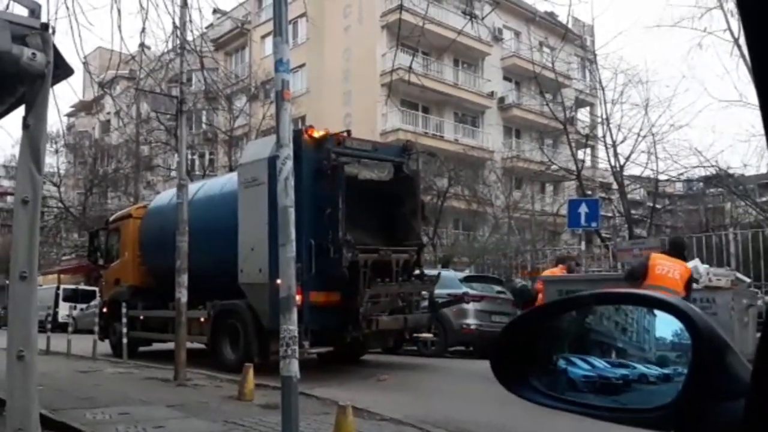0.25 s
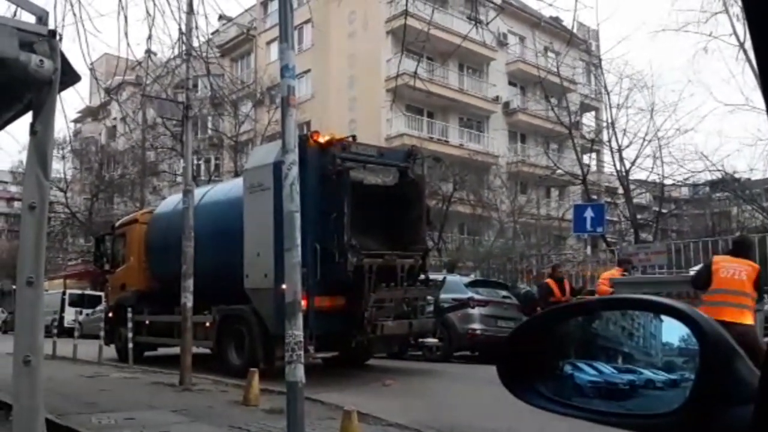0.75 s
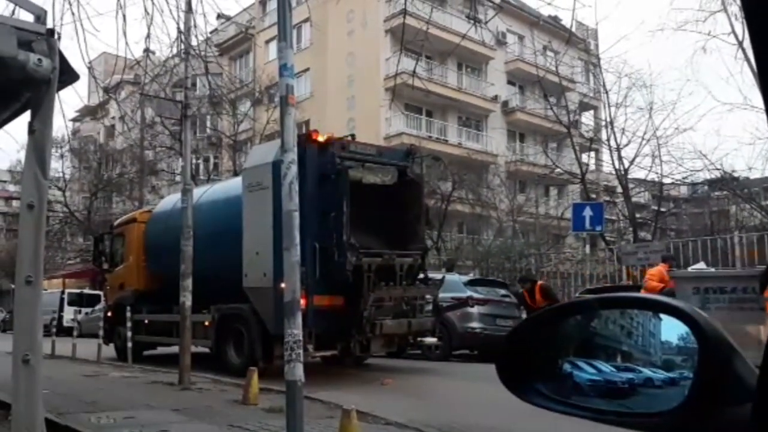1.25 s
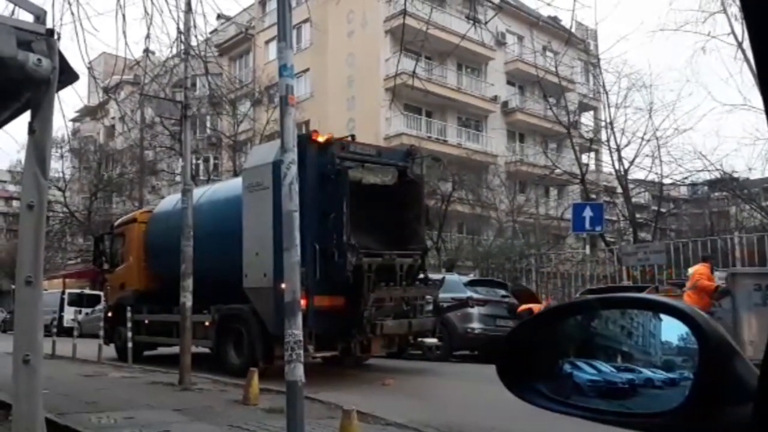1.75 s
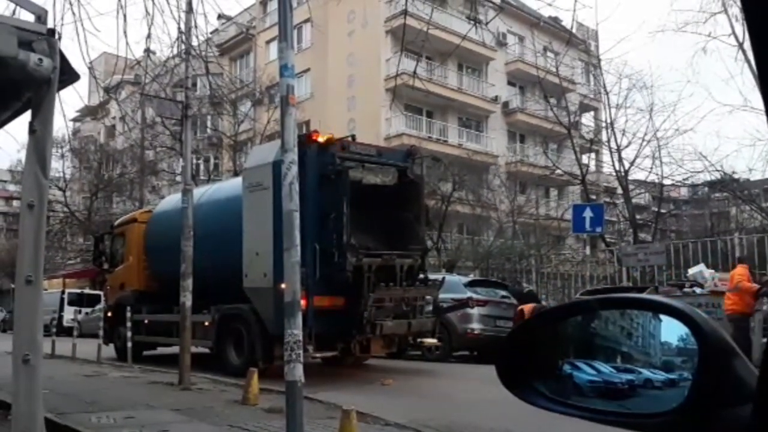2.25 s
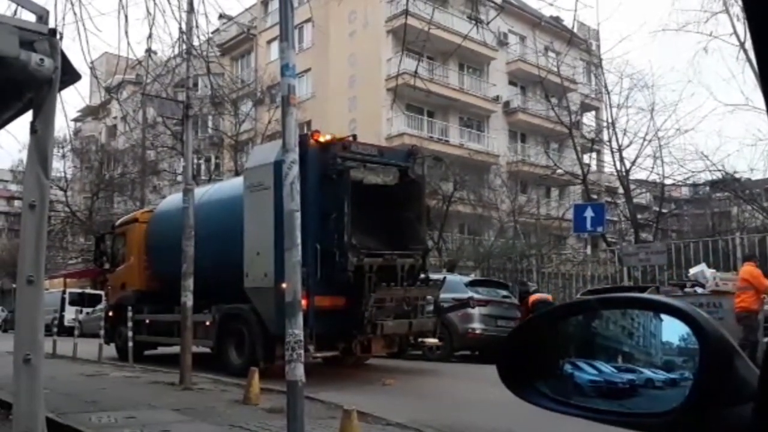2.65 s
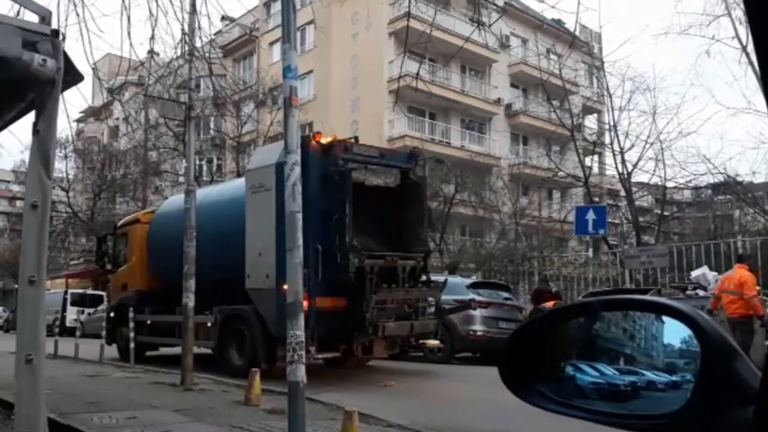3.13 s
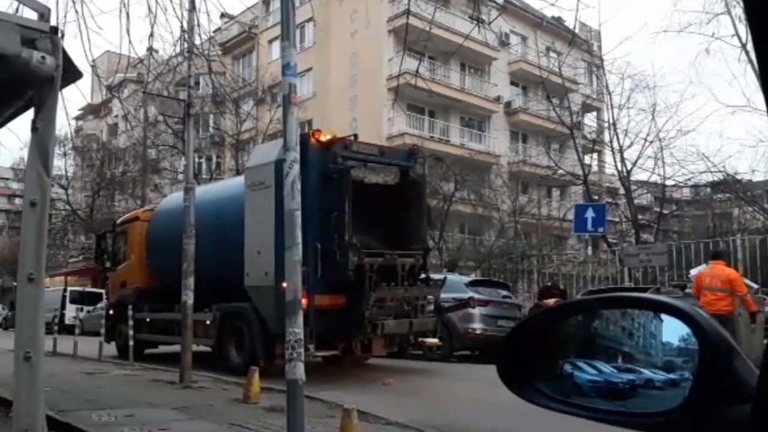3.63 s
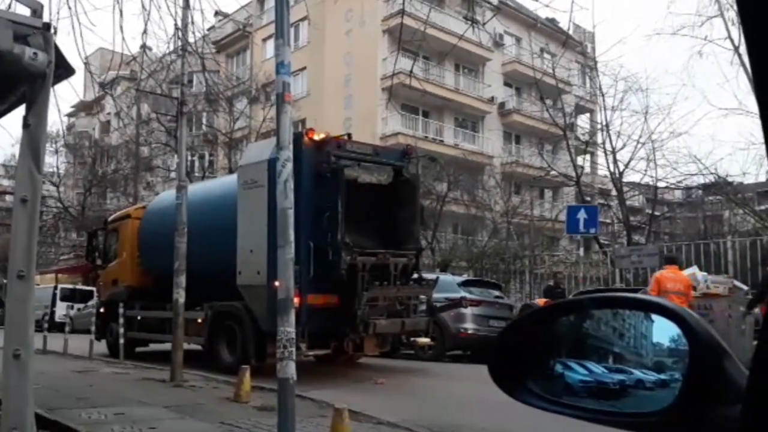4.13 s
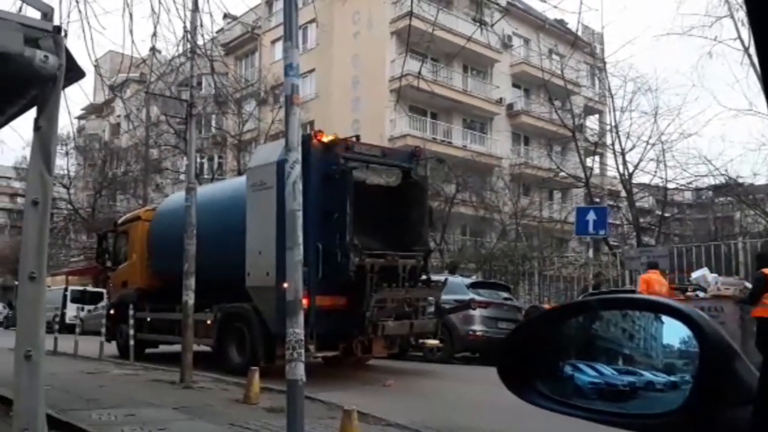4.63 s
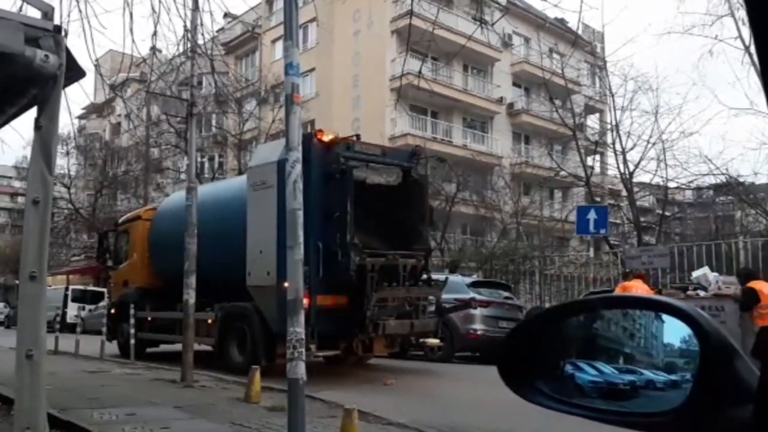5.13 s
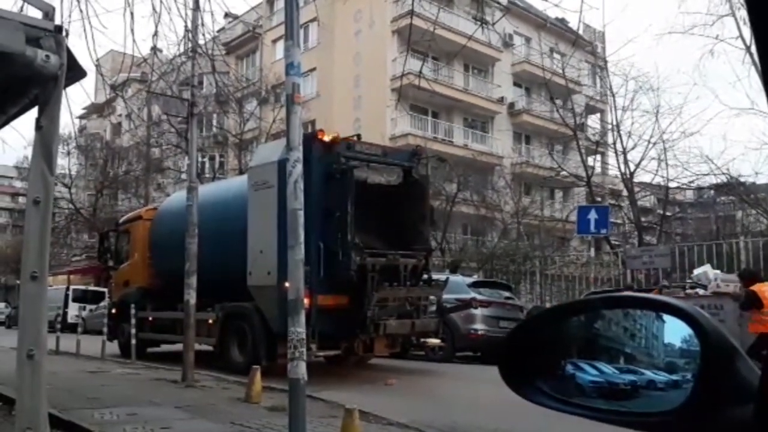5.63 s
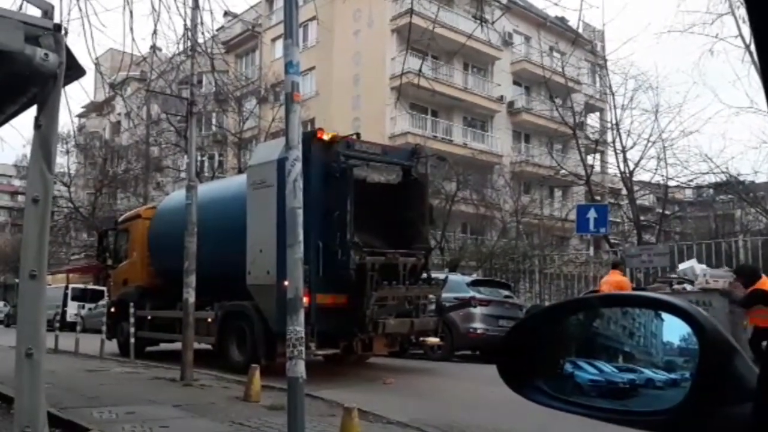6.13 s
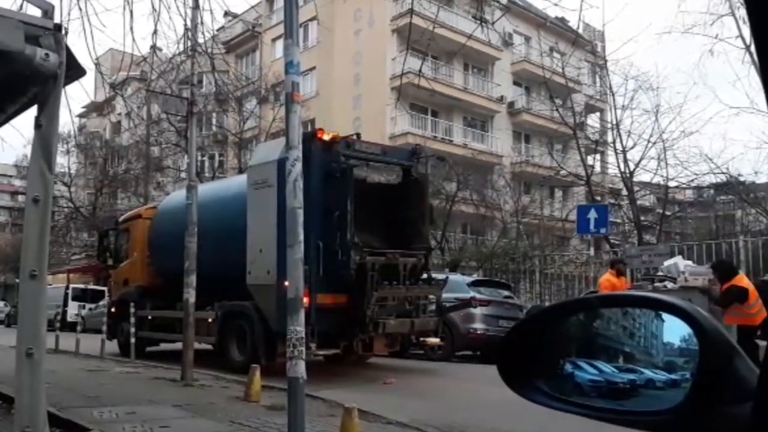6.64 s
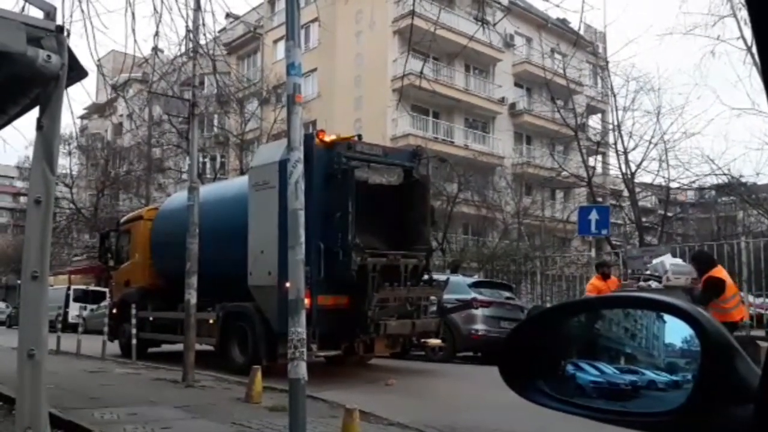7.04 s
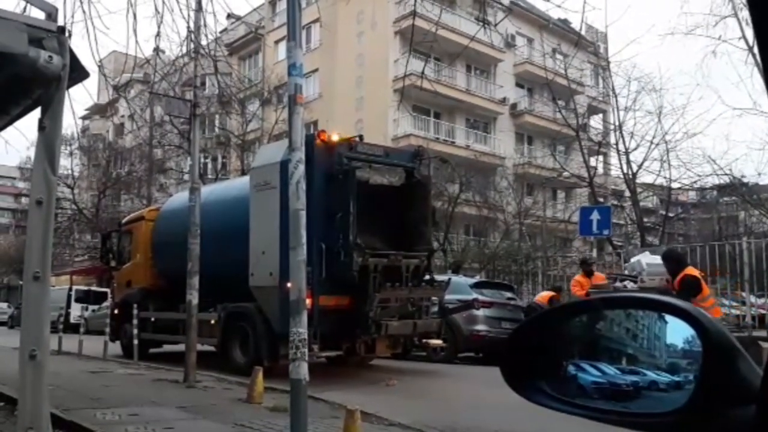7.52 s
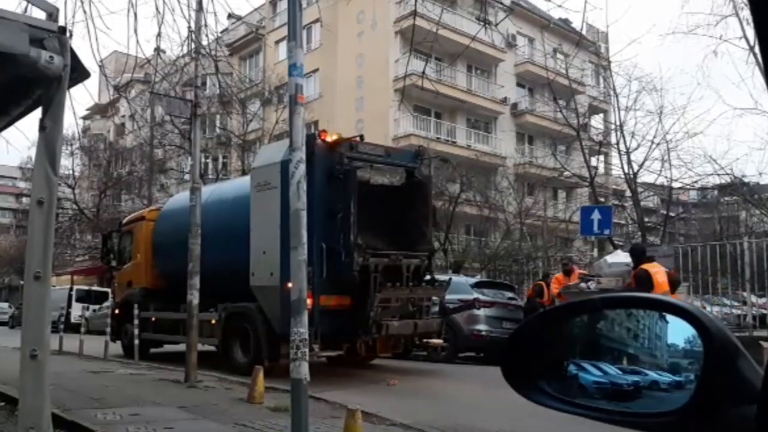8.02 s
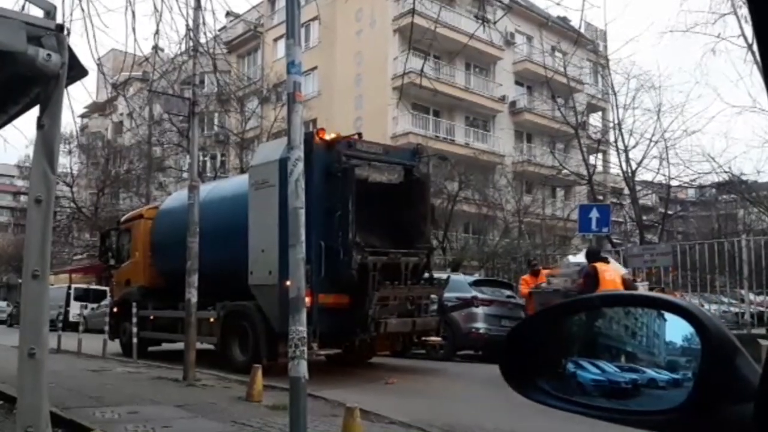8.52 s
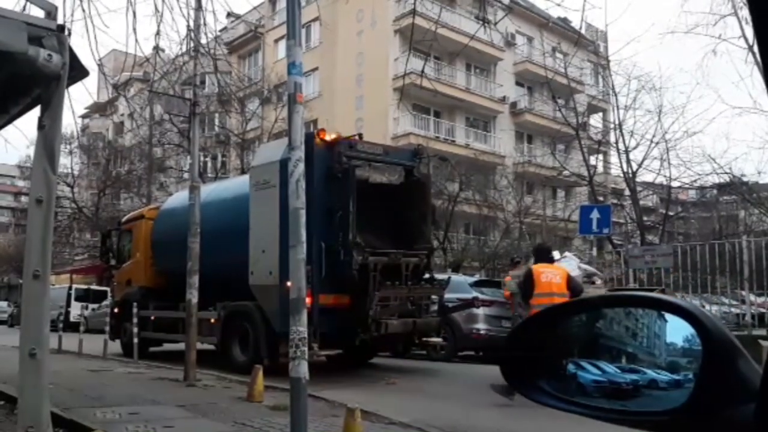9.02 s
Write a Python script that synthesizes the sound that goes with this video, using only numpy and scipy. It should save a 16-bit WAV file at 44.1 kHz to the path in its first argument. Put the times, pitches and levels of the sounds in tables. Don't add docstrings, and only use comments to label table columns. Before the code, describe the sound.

Heard from inside a parked car with its own engine ticking over: a refuse truck across the street idles in a steady, deep, pulsing boom that dominates. Beneath it, muffled by glass, metal bins roll and rattle continuously, with dull knocks, small clinks, sharp ticks and brief high squeaks. Knocks gather around two to four seconds and again after seven. Stereo cabin pickup, soft hiss, slight echo from house fronts.

```python
import sys
import numpy as np
from scipy import signal
from scipy.fft import rfft, irfft, next_fast_len
from scipy.io import wavfile

SR = 44100
rng = np.random.default_rng(int(sys.argv[2]) if len(sys.argv) > 2 else 0)


def dump(signal):
    limited = np.clip(np.atleast_2d(signal).T, -1, 1)
    pcm = np.round(limited * 32767).astype(np.int16)
    wavfile.write(sys.argv[1], SR, pcm)


def gain_from_decibels(decibels):
    exponent = np.asarray(decibels, float) / 20
    return 10 ** exponent


N = 408807
LEAD = SR // 2
SIZE = next_fast_len(N + 2 * LEAD)
HZ = np.fft.rfftfreq(SIZE, 1 / SR)
TIME = (np.arange(SIZE) - LEAD) / SR

# (strength [ratio], lateness [ms])
CYLINDERS = [(1.934, -.153), (1.439, -.61), (1.885, -.844), (1.993, -.944), (2.218, -.571), (1.659, -.484)]
# (frequency [Hz], width [Hz], signed height [ratio])
BOOM_MODES = [(27.4, 35.41, -.037), (66.01, 3, .05), (93.97, 3.01, -.071), (105.06, 6.51, -.202),
              (112.14, 13.14, 1.066), (114.63, 10.21, -1.756), (124.03, 3, 1.678), (142.48, 4.99, -.143),
              (160.46, 3, .547), (178.25, 3, 1.629), (178.81, 4.51, -1.132), (208.54, 3.47, .875),
              (208.64, 3.12, -.903), (266.44, 3, .019)]
PANEL_ORDERS = [9, 11, 13, 14, 15, 16, 26, 33, 38, 39, 40, 42, 43, 44, 45, 46, 49, 50, 54, 55, 56, 57, 58,
                60]
PANEL_DB = [-69, -68, -73, -74, -63, -69, -64, -60, -64, -59, -66, -63, -64, -70, -61, -67, -75, -70, -74,
            -71, -68, -76, -76, -78]
IDLE_ORDERS = [3, 4, 5, 6, 8, 9, 10, 12, 13, 14]
IDLE_DB = [-66, -52, -59, -56, -53, -56, -64, -61, -57, -55]
# (time [s], level [dB])
SHAKE = [(0, -62.5), (1.7, -56), (2.0, -57.5), (3.8, -46), (4.85, -48.5), (5.1, -71.5), (5.8, -63.5),
         (6.1, -55.5), (7.9, -47.5), (8.7, -44.5), (9.27, -52)]
PUMP_HZ = [52, 89, 114.7, 120.2, 147.3, 151.3, 178.3, 244, 311.6, 480]
PUMP_DB = [-62, -63, -61, -56, -60, -58, -62, -61, -69, -68]
# (frequency [Hz], density [dB per Hz])
ROAR = [(20, -87), (36, -79), (42, -82), (48, -70), (72, -73.5), (100, -72), (125, -64.5), (190, -68.5),
        (260, -74), (400, -79), (500, -83.5), (650, -89), (950, -100), (1150, -110), (1600, -125)]
# (frequency [Hz], share [0-1])
LIKENESS = [(30, .9), (60, .8), (130, 1), (290, 0.56), (640, 0), (1400, 0)]
# (frequency [Hz], density [dB per Hz])
HISS = [(650, -31), (1100, -5), (2000, -6.5), (3800, -5.5), (4600, -15), (7300, -17.5), (15100, -11.5),
        (16000, -23.5)]
# (frequency [Hz], difference [dB])
LEAN = [(34, -2), (55, -2.5), (68, -6), (85, 0), (125, -1), (170, 1.5), (200, 1), (222, 8), (245, 2.5),
        (380, 7), (700, 2), (1290, -1), (2380, -2), (15000, 0)]

# (frequency [Hz], density [dB per Hz])
DRUM = [(200, -80), (330, -18), (450, 2), (600, 3), (900, 0), (1050, -2), (1250, -25), (1800, -80)]
CLATTER = [(700, -75.5), (1050, -10), (1250, 1), (2300, -4), (2600, -30.5), (3500, -75.5)]
RATTLE = [(1600, -84.5), (2150, -17.5), (2450, 0.5), (2900, 4.5), (3600, 0.5), (4100, -4.5), (4500, -14),
          (5200, -48.5), (7000, -74.5)]
FIZZ = [(3000, -86), (4000, -5.5), (4600, -3.5), (5600, -6.5), (6750, -8), (6950, -27.5), (7300, -75.5)]
# (level at a middling push [dB], gain per dB of push [dB])
PARTS = [
    (-66.5, 0.83),
    (-77.5, 0.9),
    (-75.5, 1.34),
    (-84, 0),
]
# (frequency [Hz], width [Hz], height [dB])
SHEET = [(597, 76, 10), (874, 89, 11.5), (1029, 53, 4), (1740, 72, 5.5), (2050, 61, -2), (2290, 100, 3.5),
         (2730, 53, 4.5), (2910, 17, -14.5), (3190, 36, 3.5), (3950, 53, 6.5), (7140, 150, 6.5)]
# (time [s], rattle level [dB])
PUSH = [(0, -73), (0.66, -79), (0.82, -70.5), (1.26, -73.5), (1.55, -76), (2.47, -74), (3.01, -75.5),
        (3.42, -69.5), (3.75, -74.5), (4.14, -81), (4.5, -77), (5.4, -81), (6.1, -74.5), (6.45, -79.5),
        (7.0, -75), (7.45, -80), (8.22, -73.5), (8.7, -78.5)]
# (time [s], half length [s], fizz level [dB])
SPINS = [(0.1, 0.054, -78), (0.8, 0.045, -78), (0.98, .12, -82), (1.277, 0.14, -77.5), (3.25, .05, -78),
         (1.95, 0.087, -83), (2.45, 0.16, -81), (3.55, 0.21, -77), (4.502, 0.17, -78), (6.8, 0.34, -79),
         (7.87, 0.11, -79)]
# (time [s], rattle level [dB], drum above it [dB], clatter above it [dB], t60 [s])
KNOCKS = [(0.8621, -62, -1, -8, 0.45), (2.0277, -56, -1, -7, 0.42), (2.7107, -62.5, 4.5, -13, 0.34),
          (2.983, -63.5, -11, -16, 0.15), (3.2268, -57, 7.5, -7, 0.59), (3.468, -58, 6.5, -2, 0.44),
          (3.689, -60, -20.5, -8, 0.43), (4.1095, -69, 6.5, 6, 0.26), (5.882, -58, 2.5, -1, 0.55),
          (7.0934, -57.5, 4.5, -1, 0.23), (7.2, -65, -3, -19, 0.29), (7.393, -54.5, 12, 2.5, 0.55),
          (7.5083, -64, 9, 0, 0.4), (7.9088, -62.5, -9.5, -16, 0.22), (8.0257, -53, 11, 3, 0.36),
          (8.034, -57, 12, 4, 0.3), (8.319, -61.5, -10.5, -0.5, 0.55)]
CLINKS = [(0.3192, -63, -9, -1, 0.3), (0.4309, -61, 12.5, -6, 0.2), (0.7594, -68, 0, 7.5, 0.58),
          (1.1094, -66, 1.5, -18, 0.44), (1.9194, -67.5, 6.5, 6.5, 0.59), (2.266, -62.5, 16, 0.5, 0.45),
          (2.7931, -61.5, -3, -3, 0.36), (3.213, -60.5, -1, -3, 0.3), (4.505, -62, -2, -2, 0.5),
          (4.532, -61, -10.5, -5, .35), (4.8094, -72, -3, -12, 0.23), (8.5026, -56.5, -16.5, -19, 0.46),
          (8.8597, -77, 8.5, -7, 0.26)]
# (frequency [Hz], level above the knock [dB], t60 [s])
WALL_MODES = [(587, -6.5, 0.17), (733, -13, 0.1), (878, -11.5, 0.23), (1022, -11, 0.25),
              (1538, -13.5, 0.36), (2420, -10, 0.26), (2800, -10, 0.14), (3330, -6, 0.2)]
# (time [s], peak level [dB], pitch [Hz])
TAPS = [(0.03, -51, 476), (1.336, -52, 482), (1.927, -52, 452), (2.273, -45, 600), (4.001, -56, 458),
        (4.191, -52, 587), (4.47, -53, 452), (5.417, -57, 452), (5.785, -48, 482), (6.937, -50, 581),
        (6.995, -54, 506), (8.319, -53, 452), (8.928, -52, 452), (8.989, -52, 552), (9.123, -52, 455)]
# (time [s], level [dB])
TICKS = [(0.319, -56), (0.431, -50.5), (1.337, -65), (1.927, -63), (2.272, -58), (3.213, -60.5),
         (4.11, -63.5), (5.786, -58), (5.824, -57.5), (6.937, -59.5), (7.399, -57), (8.028, -51),
         (8.32, -60.5), (1.301, -59.5), (7.39, -64)]

# (peak time [s], rise
# [s], fall [s], pitch at the peak [Hz], level [dB])
WHISTLES = [(0.785, .045, .012, 6650, -79), (1.21, .012, .06, 6330, -73), (3.57, 0.18, 0.09, 6820, -61),
            (6.53, .015, .05, 5650, -76)]
SQUEALS = [(2.295, 0.04, 0.045, 5880, -66), (2.338, 0.027, 0.015, 5880, -68),
           (2.274, 0.011, .013, 2890, -61), (2.3, .018, 0.024, 2890, -54), (2.328, .01, .012, 2990, -61),
           (2.346, .01, .014, 2900, -62), (2.367, .006, .007, 2900, -64), (2.388, .006, .008, 2950, -68),
           (2.41, .014, .016, 2900, -67), (3.42, .035, .03, 6180, -82), (2.375, .03, .015, 5450, -80),
           (2.46, .03, .06, 2960, -77), (2.57, .02, .03, 2800, -74), (4.537, .05, .15, 2720, -77),
           (5.366, 0.11, .04, 2760, -80.5), (5.57, .04, .06, 2780, -75.5), (5.782, 0.033, .03, 2750, -71),
           (5.83, 0.028, .025, 2750, -72), (6.047, 0.009, 0.053, 2740, -58), (6.125, 0.02, .045, 2740, -73),
           (7.114, 0.11, 0.072, 2680, -74), (7.21, 0.084, 0.14, 2780, -82)]
GRINDS = [(2.027, 0.022, 0.036, 2605, -76), (2.335, .02, .03, 3150, -70), (2.52, .05, .1, 3050, -82),
          (2.74, .05, .04, 3100, -73.5), (0.875, .018, .018, 3330, -71), (0.866, .012, .012, 2850, -75),
          (0.895, .008, .008, 2780, -74), (0.915, .008, .012, 2750, -74), (0.775, .015, .03, 2770, -78),
          (1.157, .01, .012, 3150, -77), (7.422, 0.008, .012, 2900, -64), (7.406, .007, .008, 2750, -68),
          (7.425, .015, .03, 2450, -76), (7.55, .04, .05, 3100, -82), (8.045, .012, .02, 3300, -66),
          (8.035, .006, .01, 2750, -66), (8.09, .01, .02, 2750, -73), (3.25, .015, 0.012, 3060, -67),
          (3.268, .008, .016, 3030, -66), (3.295, .008, .02, 2850, -69), (3.32, .01, .02, 3000, -73),
          (5.895, .01, .03, 3150, -69)]
GROANS = [(0.323, .007, 0.025, 1660, -71), (0.434, 0.006, 0.024, 1800, -70), (0.434, .006, .016, 950, -66),
          (0.81, .012, .012, 2010, -72), (0.835, .012, .02, 2010, -72), (0.866, .012, .02, 2000, -75),
          (0.91, 0.012, .015, 2020, -72), (0.945, .02, .03, 1990, -73), (0.995, 0.015, 0.012, 2030, -71.5),
          (1.02, .012, .015, 1950, -72), (1.066, .015, .015, 2050, -74), (1.096, .015, .14, 2035, -78),
          (0.9, .12, .15, 2020, -79), (0.805, .03, .02, 1300, -77), (8.045, .015, .05, 2320, -67.5),
          (8.045, .015, .05, 889, -60), (8.04, .012, .04, 589, -58), (7.401, .005, .005, 990, -64),
          (7.41, .004, .006, 950, -61), (7.432, .008, .03, 920, -67), (7.478, .005, .008, 920, -63),
          (7.511, .006, .01, 960, -68), (6.28, .02, .03, 900, -72), (2.29, .02, .05, 800, -66),
          (3.45, 0.066, 0.099, 2050, -78.5), (3.6, 0.087, 0.34, 2050, -77.5), (4.38, 0.032, .04, 2140, -82),
          (4.48, 0.015, .02, 2010, -75), (7.65, .15, 0.25, 2250, -83.5)]
SCRAPES = [(0.802, .07, 0.2, 3950, -71.5), (1.075, 0.04, .03, 3800, -65), (1.122, .015, .02, 4100, -66),
           (1.125, .02, .025, 4500, -68), (0.79, .04, .03, 3700, -68), (0.812, .012, .015, 4050, -65),
           (3.231, .014, .018, 4200, -53), (3.5, .3, .3, 4000, -67), (0.9, .06, .08, 3900, -68),
           (3.3, .03, .03, 4100, -67), (3.25, .025, .04, 3700, -61), (3.26, .03, 0.055, 4570, -70),
           (3.41, .02, .04, 3950, -67), (4.832, 0.031, .15, 3970, -75), (6.13, 0.14, .1, 4020, -67),
           (7.815, 0.064, 0.14, 3800, -70.5), (8.296, .15, .04, 4100, -69.5),
           (8.339, 0.019, 0.14, 3930, -68), (8.53, 0.1, .15, 3900, -69)]
HISSES = [(1.31, .06, .07, 6500, -82), (1.23, .03, .03, 6750, -84), (1.96, .08, 0.091, 6400, -89),
          (4.38, .04, 0.37, 6700, -85), (8.53, .05, .06, 5780, -78), (2.29, .03, .08, 6100, -83),
          (2.33, .05, .05, 5400, -82), (2.365, .015, .015, 6000, -81), (2.41, .03, .02, 5900, -81),
          (2.285, .015, .03, 6100, -81), (4.545, .02, .04, 5700, -78)]
# (pitch waver [share], pitch sag at the ends [share], peak offset [dB], ends below peak [dB])
RUBS = [
    (0.0026, 0.12, -5, -26.5),
    (0.006, 0.0036, -4.5, -15),
    (0.024, 0.0082, 2, -14),
    (0.038, 0.0054, -2.5, -9.5),
    (0.03, .005, -15, -10.5),
    (0.024, 0.0039, -7, -7.5),
]
WHEEL_HZ = (3500, 5000)
LAGS = (5, 10, 7)


def evened(x):
    return x / np.sqrt(np.mean(x ** 2) + 1e-20)


def read(points, hz):
    f, value = np.transpose(points)
    return np.interp(np.log(hz + 1), np.log(f + 1), value)


def coloured(x, gain):
    return irfft(rfft(x) * gain, SIZE)


def drift(rate_hz):
    count = SIZE // 16 + 2
    low_pass = np.exp(-(np.fft.rfftfreq(count, 16 / SR) / rate_hz) ** 2)
    slow = irfft(rfft(rng.standard_normal(count)) * low_pass, count)
    return np.interp(np.arange(SIZE) / 16, np.arange(count), evened(slow))


def truck():
    cycle_hz, first_s = 5.66628, -.014
    turns = cycle_hz * TIME + .0023 * np.cos(2 * np.pi * 1.265 * TIME - 1.36)
    firing = np.arange(-12, 6 * int(turns[-1]))
    strength, late_ms = np.transpose(CYLINDERS)[:, firing % 6]
    strength = strength * (1 + .016 * rng.standard_normal(len(firing)))
    at = (np.interp(firing / 6, turns, TIME) + first_s + late_ms / 1000) * SR + LEAD
    whole, pushes = at.astype(int), np.zeros(SIZE)
    pushes[whole] = strength * (1 - at % 1)
    pushes[whole + 1] = strength * (at % 1)
    ring = sum(height / (1 + 2j * (HZ - f) / width) for f, width, height in BOOM_MODES)
    ring *= (HZ > 31) * np.exp(-(HZ / 330) ** 6)
    boom = gain_from_decibels(-43.0) * SR / cycle_hz * coloured(pushes, ring)
    for order, db in zip(PANEL_ORDERS, PANEL_DB):
        boom += np.sqrt(2) * gain_from_decibels(db) * np.cos(2 * np.pi * (order * turns + rng.random()))
    return boom


def car():
    turns = np.cumsum(15.54 + .07 * drift(1.5)) / SR
    out = np.zeros(SIZE)
    for order, db in zip(IDLE_ORDERS, IDLE_DB):
        if order == 4:
            db = np.interp(TIME, *np.transpose(SHAKE))
        out += gain_from_decibels(db + 2.2 * drift(2.2)) * np.cos(2 * np.pi * (order * turns + rng.random()))
    for hz, db in zip(PUMP_HZ, PUMP_DB):
        out += gain_from_decibels(db) * np.cos(2 * np.pi * (hz * TIME + rng.random()) + .5 * drift(1.3))
    return np.sqrt(2) * out


def roar():
    left, other = rng.standard_normal((2, SIZE)) * np.sqrt(SR / 2)
    same = np.clip(read(LIKENESS, HZ), 0, 1)
    right = coloured(left, same) + coloured(other, np.sqrt(1 - same ** 2))
    return coloured(np.array([left, right]), gain_from_decibels(read(ROAR, HZ))) * gain_from_decibels(0.26 * drift(4.2))


def hiss():
    noise = coloured(rng.standard_normal((2, SIZE)), gain_from_decibels(read(HISS, HZ)))
    return gain_from_decibels(-72.5) * evened(noise)


def bins():
    push_db = np.interp(TIME, *np.transpose(PUSH)) + 75
    power = np.array([gain_from_decibels(2 * (db + follow * push_db) - 1.5 + 3.4 * drift(25.) + 3.5 * drift(11.0))
                      for db, follow in PARTS])
    power[-1] += sum(gain_from_decibels(2 * db) * np.exp(-((TIME - s) / half_s) ** 2) for s, half_s, db in SPINS)
    t = np.arange(LEAD) / SR
    for rows, fizz_db in (KNOCKS, -17.5), (CLINKS, -5):
        for s, db, drum_db, clatter_db, t60 in rows:
            rise = 1 - np.exp(-t / (0.032 * t60))
            shape = gain_from_decibels(2 * (db - 4.0 - 60 * t / t60)) * rise ** 2
            share = gain_from_decibels(2 * np.array([drum_db, clatter_db, 0, fizz_db]))
            start = LEAD + round((s - .003) * SR)
            power[:, start:][:, :LEAD] += share[:, None] * shape
    sheet = np.sqrt(1 + sum(gain_from_decibels(2 * db) / (1 + (2 * (HZ - f) / width) ** 2) for f, width, db in SHEET))
    impacts = rng.standard_normal((2, SIZE)) * gain_from_decibels(3.6 * rng.exponential(1, SIZE).clip(0, 4))
    impacts[1] += 0.14 * impacts[0]
    out, shaken = 0, rfft(impacts) * sheet
    for level, colour in zip(np.sqrt(power), (DRUM, CLATTER, RATTLE, FIZZ)):
        out = out + level * evened(irfft(shaken * gain_from_decibels(read(colour, HZ)), SIZE))
    return out


def taps():
    out, t = np.zeros(SIZE), np.arange(LEAD // 4) / SR
    for s, db, hz in TAPS:
        tap = gain_from_decibels(db + 1 - 60 * t / .05) * np.sin(2 * np.pi * hz * t)
        out[LEAD + round(s * SR):][:len(t)] += tap
    return out * gain_from_decibels([[-3.], [0.]])


def street(x):
    t = np.arange(LEAD) / SR
    tail = rng.standard_normal((2, LEAD)) * gain_from_decibels(-60 * t / .25) * (t > .006)
    return signal.fftconvolve(x, tail / np.linalg.norm(tail[0]), axes=1)[:, :SIZE]


def squeaks():
    hold, bend = 0.11, .65
    out = np.zeros((len(LAGS), SIZE))
    waver, flutter = drift(250.), drift(45.)
    kinds = (WHISTLES, SQUEALS, GRINDS, GROANS, SCRAPES, HISSES)
    for rows, (rough, sag, peak_db, ends_db) in zip(kinds, RUBS):
        for peak_s, rise_s, fall_s, hz, db in rows:
            start = LEAD + round((peak_s - rise_s) * SR)
            on = slice(start, LEAD + round((peak_s + fall_s) * SR))
            corners = [-rise_s, -hold * rise_s, hold * fall_s, fall_s]
            slack = np.interp(TIME[on] - peak_s, corners, [1, 0, 0, 1])
            turns = np.cumsum(hz * (1 - sag * slack ** bend + rough * waver[on])) / SR
            level = gain_from_decibels(db + peak_db + ends_db * slack + 3.0 * flutter[on])
            level = level * signal.windows.tukey(len(turns), .2)
            wheel = np.searchsorted(WHEEL_HZ, hz)
            out[wheel, on] += np.sqrt(2) * level * np.sin(2 * np.pi * turns)
    pair = np.array([sum(map(np.roll, out, LAGS)), out.sum(0)]) * gain_from_decibels([[-1.5], [1.5]])
    return gain_from_decibels(6.5) * pair + gain_from_decibels(-10) * street(pair)


def ticks():
    out, t = np.zeros((2, SIZE)), np.arange(LEAD // 4) / SR
    for (s, db), noise in zip(TICKS, rng.standard_normal((len(TICKS), 2, len(t)))):
        snap = gain_from_decibels(db - 60 * t / .016) * (noise + 0.88 * noise[::-1])
        out[:, LEAD + round(s * SR):][:, :len(t)] += snap
    glass = (HZ > 400) / np.sqrt(1 + (HZ / 2600) ** 2) / (1 + (HZ / 6800) ** 12)
    return coloured(out, glass)


def wall():
    out, t = np.zeros((2, SIZE)), np.arange(LEAD // 2) / SR
    luck = rng.standard_normal((len(KNOCKS), len(WALL_MODES), 4))
    for (s, db, drum_db, *_), draws in zip(KNOCKS, luck):
        for (hz, up_db, t60), (detune, vary_db, left, right) in zip(WALL_MODES, draws):
            level = gain_from_decibels(db + up_db + vary_db + drum_db * (hz < 1200) - 60 * t / t60)
            level = level * (1 - np.exp(-t / .006))
            phase = 2 * np.pi * hz * (1 + 0.013 * detune) * t + 2 * np.array([[left], [right]])
            out[:, LEAD + round(s * SR):][:, :len(t)] += level * np.sin(phase)
    return out


def thud():
    colour = np.exp(-np.log((HZ + 1) / 110) ** 2 / 0.65)
    noise = evened(coloured(rng.standard_normal(SIZE), colour))
    return gain_from_decibels(-42) * noise * np.exp(-((TIME - 3.33) / 0.15) ** 2)


def scene():
    boom = truck()
    air = car() + roar() + hiss() + bins() + taps() + squeaks() + ticks() + wall() + thud()
    air += boom + coloured(boom, HZ > 90) * .12 * drift(9.)
    lean = gain_from_decibels(read(LEAN, HZ) / 2) * np.exp(.06j * (HZ < 600))
    return coloured(air, np.array([lean, 1 / lean]))[:, LEAD:LEAD + N]


def roll_off(x):
    return signal.sosfilt(signal.butter(12, 15760, fs=SR, output="sos"), x)


def record(dry):
    closing = np.minimum(np.arange(N)[::-1] / (.004 * SR), 1)
    return roll_off(dry * closing)


dry = scene()
out = record(dry)
dump(out)
```